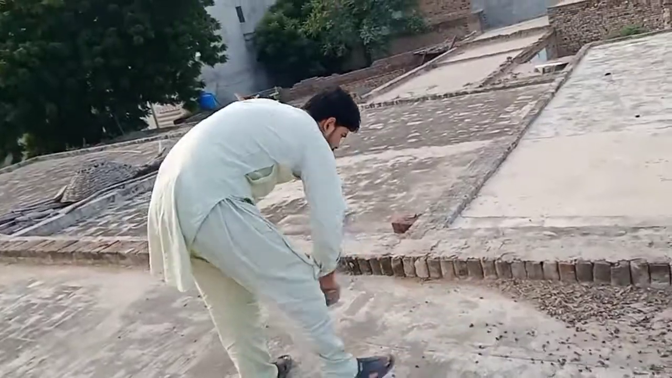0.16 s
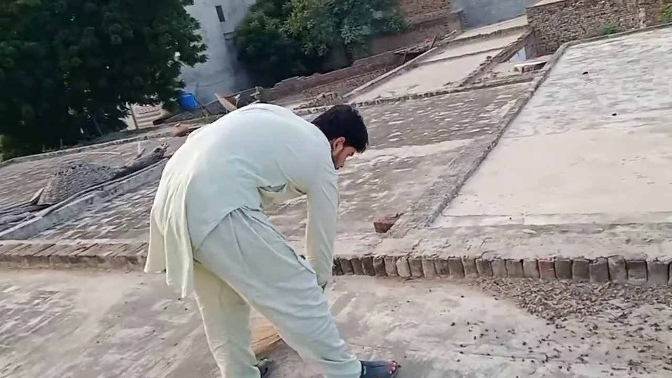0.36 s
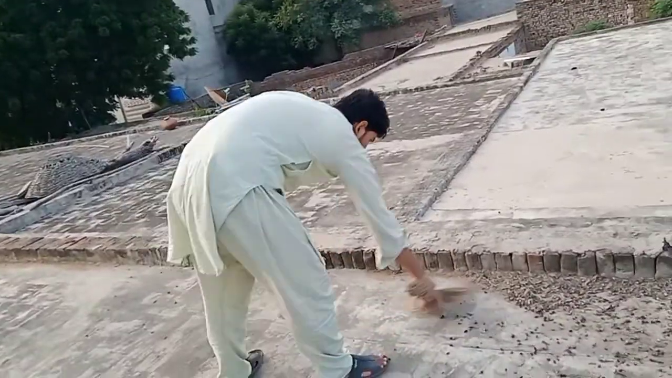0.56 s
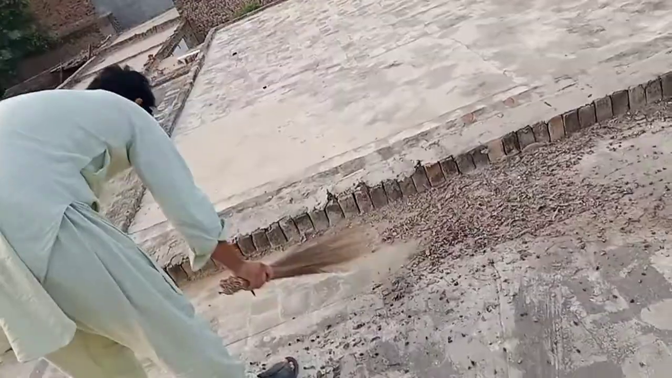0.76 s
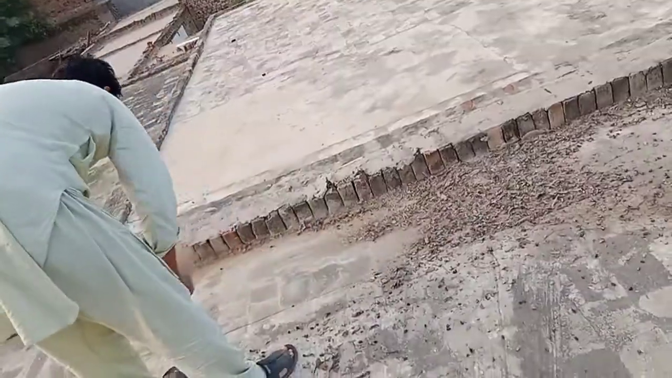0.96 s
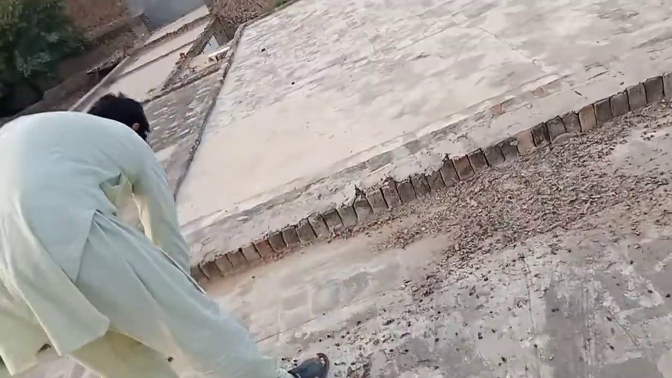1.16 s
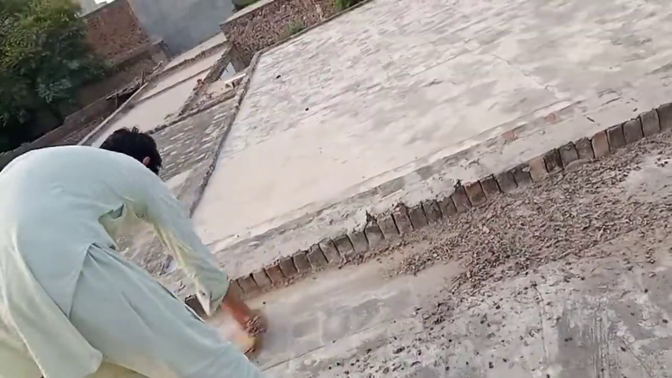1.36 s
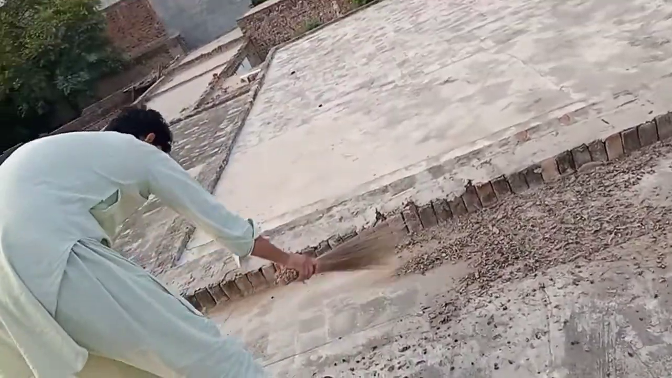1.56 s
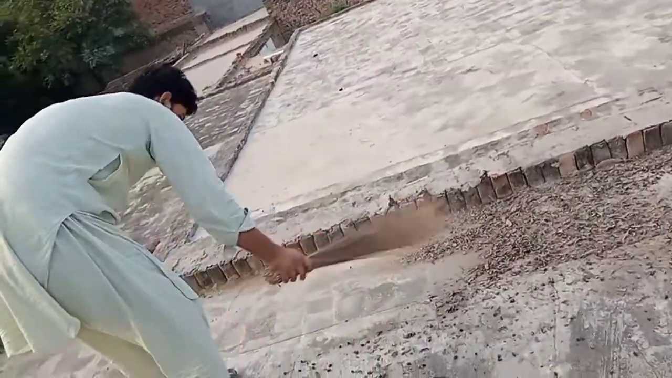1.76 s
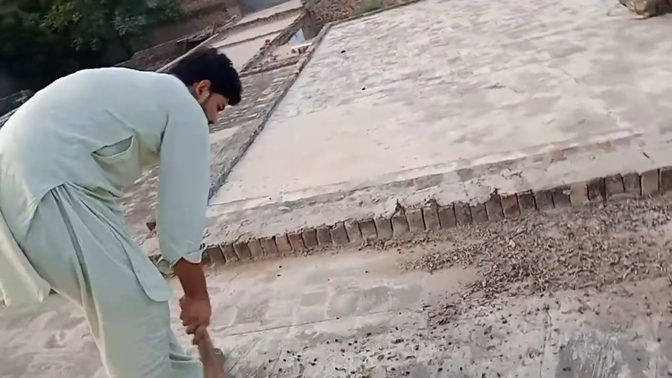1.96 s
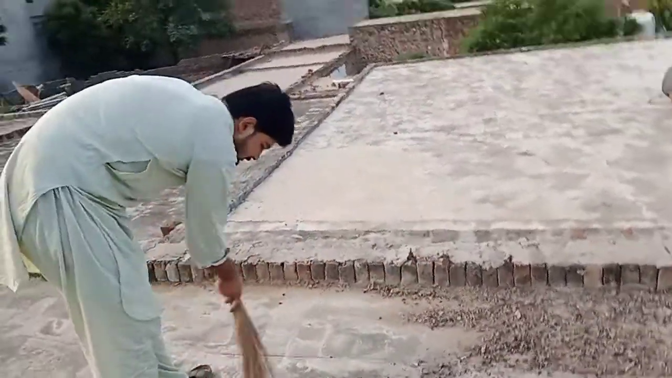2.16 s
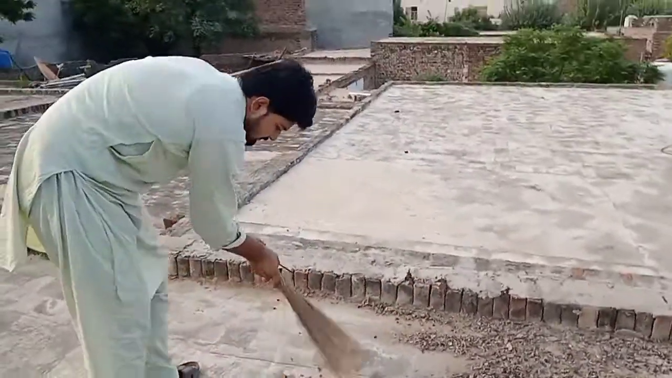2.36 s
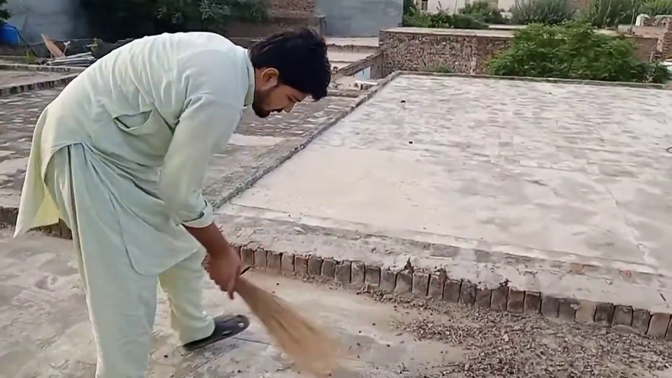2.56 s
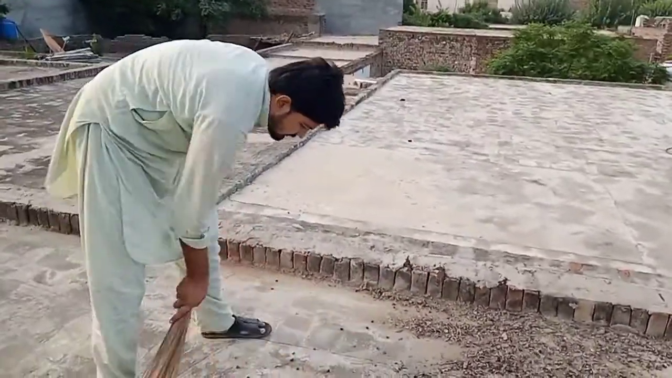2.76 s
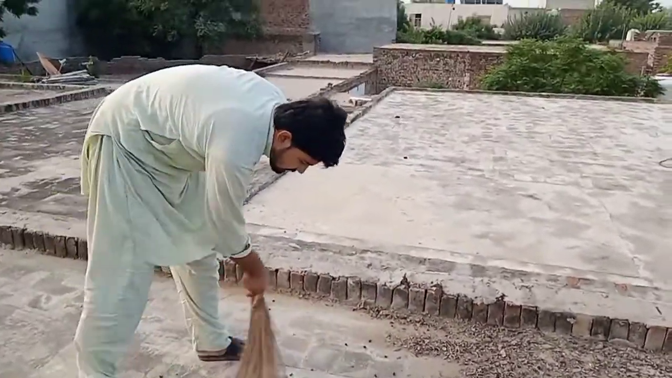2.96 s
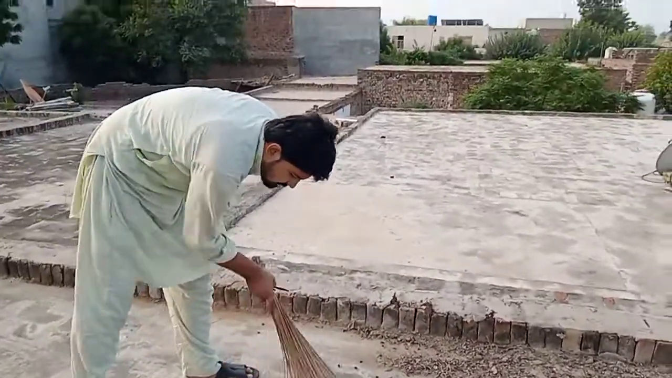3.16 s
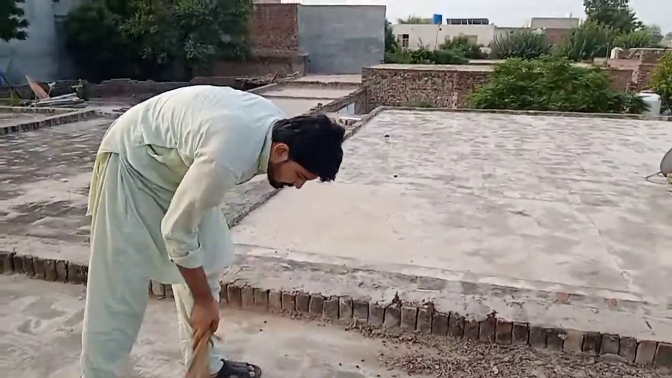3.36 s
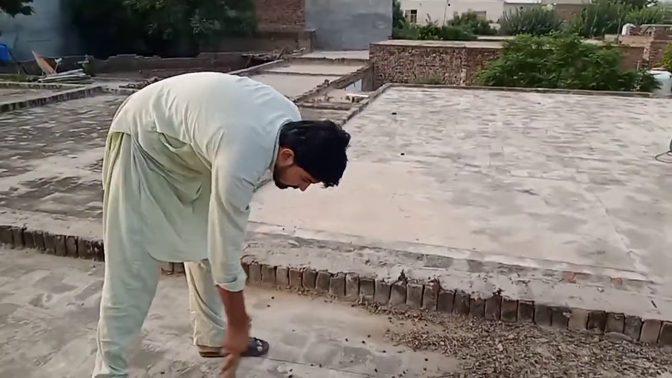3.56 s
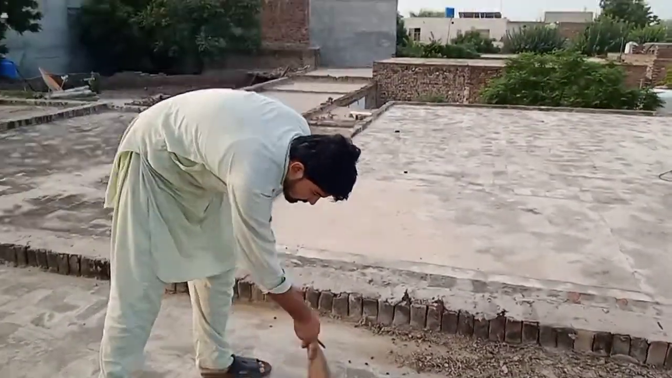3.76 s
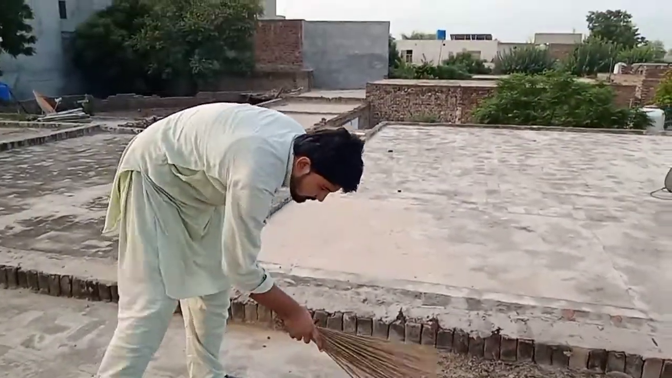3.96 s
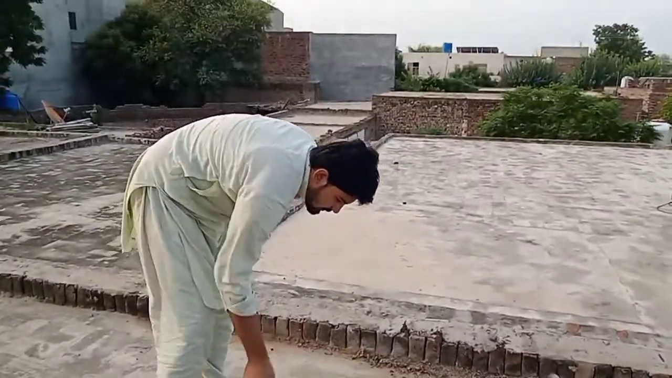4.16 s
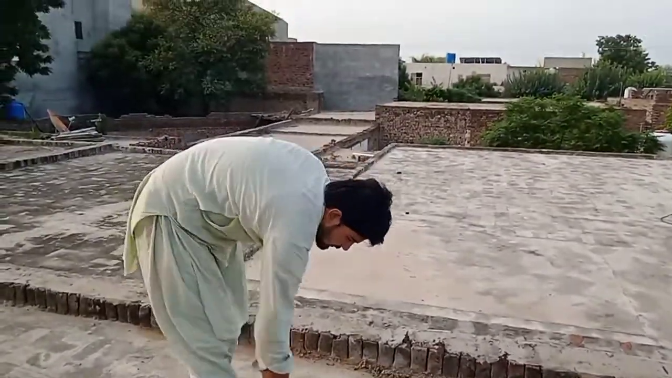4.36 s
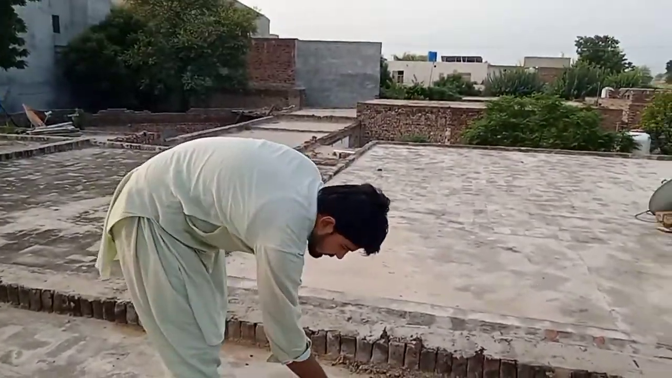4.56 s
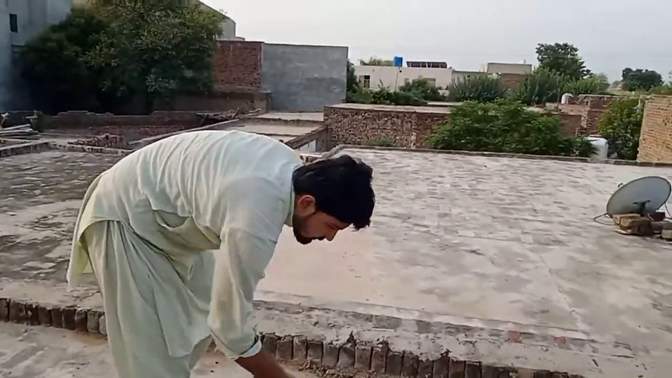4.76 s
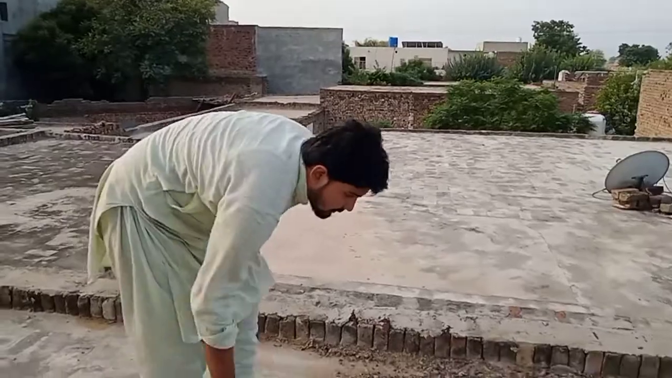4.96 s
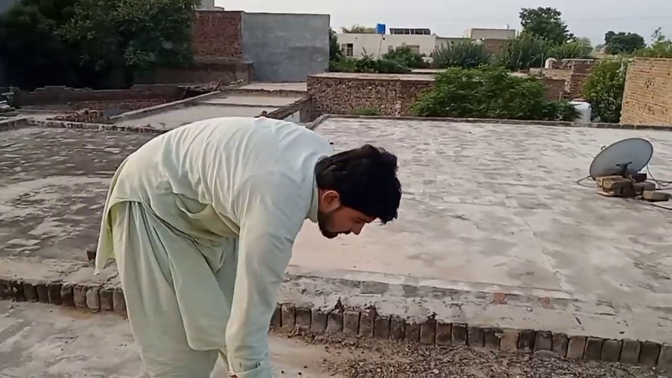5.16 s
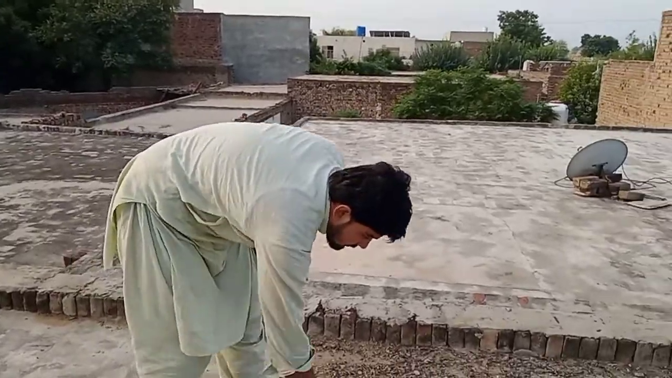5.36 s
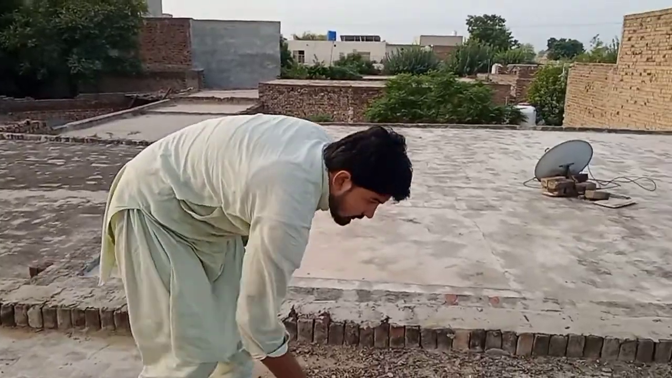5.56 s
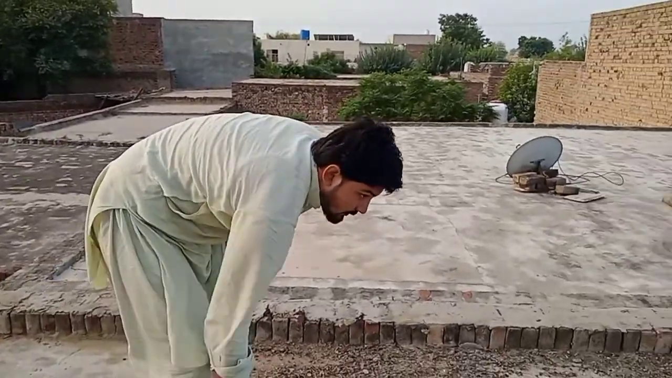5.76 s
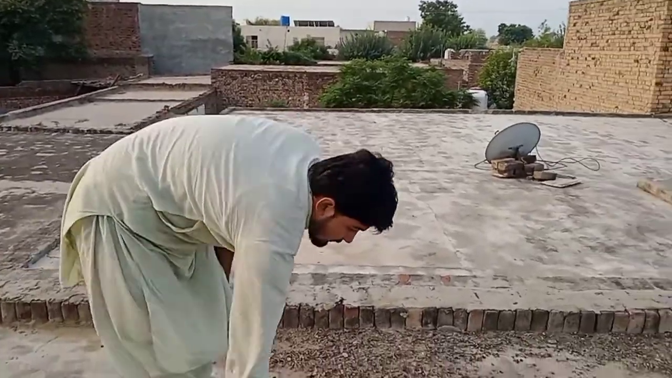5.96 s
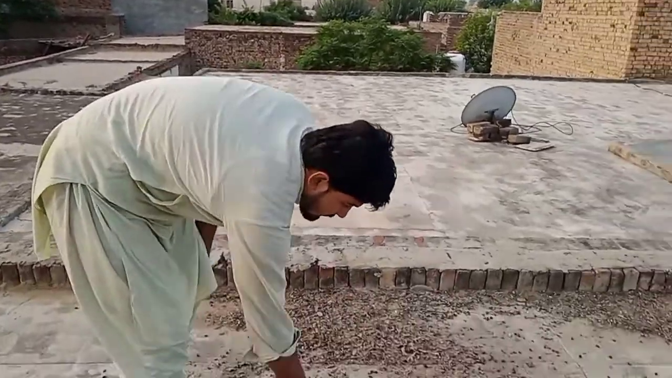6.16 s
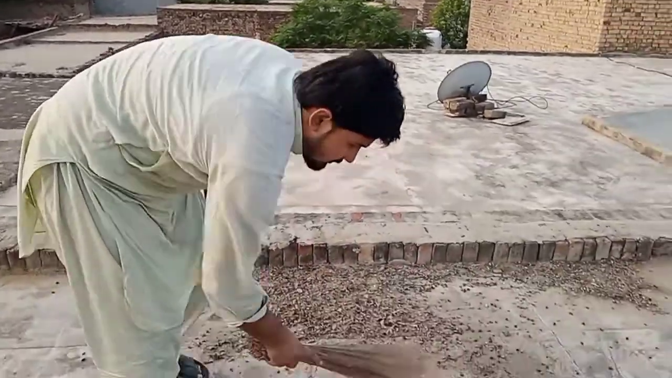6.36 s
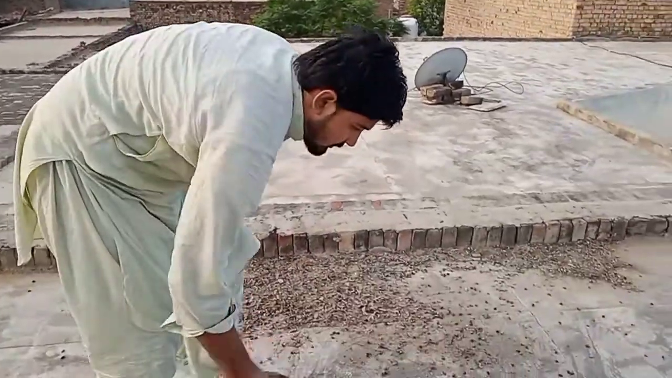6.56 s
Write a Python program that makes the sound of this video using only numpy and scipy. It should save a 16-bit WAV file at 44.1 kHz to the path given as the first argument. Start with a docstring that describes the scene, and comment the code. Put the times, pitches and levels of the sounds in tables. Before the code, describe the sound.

A short straw broom sweeps dust and grit across an open brick rooftop, close to the microphone. About nine dry, hissing strokes come at a steady pace, with stalks ticking and crumbs skittering between them. A little before halfway, three soft knocks and one sharp, loud click hit the microphone. A sandal scuffs lightly now and then, and small birds chirp faintly over the low hush of a distant town.

```python
"""A short straw broom swishes close by: nine strokes push dust and dry leaves over an open brick roof.
Stalk tips catch and slip and set the bundle ringing; loose grit ticks and a sandal scuffs.
Far off, small birds call over the hush of a town.
Partway through, three soft knocks and one sharp click land on the body of the mono microphone."""
import sys
import numpy as np
from scipy import signal
from scipy.fft import rfft, irfft, next_fast_len
from scipy.io import wavfile

SR = 44100
rng = np.random.default_rng(int(sys.argv[2]) if len(sys.argv) > 2 else 0)


def output_pcm(signal):
    """Save a mono or channel-first signal as 16-bit PCM at the path in sys.argv[1].

    Samples are clipped to [-1, 1] before scaling.
    """
    pcm = np.clip(np.atleast_2d(signal).T, -1, 1) * 32767
    wavfile.write(sys.argv[1], SR, np.round(pcm).astype(np.int16))


N = 295419
TIME = np.arange(N) / SR
PADDED = next_fast_len(N, True)
FREQS = np.maximum(np.fft.rfftfreq(PADDED, 1 / SR), 1)

# tone of the sweeping, including the microphone's resonant peaks: (frequency [Hz], relative level [dB])
SWEEP_COLOUR = [(1000, -35), (1270, -11), (1550, -16), (2200, -10.5), (2750, 1.5), (3700, -2.5),
                (5100, -3.5), (5750, 1), (6650, 0.5), (7200, 4.5), (8300, -8.5), (13700, -14.5), (14700, 1),
                (15400, 2)]
# pushes of the broom; a stroke is one or two, and some begin with a light touch:
# (touch [s], attack [s], hold [s], release [s], first swish [dB], last swish [dB],
#  rasp of bent stalks [dB re swish], scrape on brick [dB re swish], fine dust [dB re swish],
#  bundle ring [Hz], ring lift [dB])
BROOM_PUSHES = [ (0.62, 0.069, 0.13, 0.094, -37, -31.5, -8, -24, 3, 3800, 5),
                (1.102, 0.013, 0.073, 0.018, -39, -38.5, 2.5, -18, -15, 3420, 1.5),
                (1.263, 0.025, 0.17, 0.13, -39.5, -33, -5.5, -22, 0.5, 3970, 5),
                (1.457, 0.079, 0.1, 0.11, -39.5, -30.5, -8.5, -23.5, 5, 3900, 9),
                (2.071, 0.068, 0.098, 0.054, -34, -29, 2.5, -15, 0, 2920, -2),
                (2.222, 0.075, 0.24, 0.14, -31, -36.5, -8.5, -22, 1, 4040, 8),
                (2.826, 0.077, 0.082, 0.23, -34.5, -32, -7, -17, -0.5, 4520, 8.5),
                (2.999, 0.061, 0.1, 0.094, -31.5, -28, -16.5, -22, 0.5, 4730, 7),
                (3.547, 0.041, 0.033, 0.033, -47.5, -47, -21, -22, -3, 5400, 1),
                (3.619, 0.074, 0.24, 0.081, -28.5, -30, -16.5, -18.5, 1.5, 6300, 3),
                (4.287, 0.083, 0.047, 0.1, -37, -40, -28, -24.5, -3, 5130, 3.5),
                (4.455, 0.076, 0.24, 0.094, -28, -27, -21.5, -20, -2, 5120, 5.5),
                (5.191, .03, 0.033, .05, -47.5, -47.5, -25, -16, -0.5, 5670, 10.5),
                (5.253, 0.077, 0.19, 0.16, -30, -26.5, -17.5, -17.5, 1.5, 6060, 7.5),
                (5.579, 0.055, 0.043, 0.048, -28.5, -28.5, -21, -18.5, -1.5, 5900, 7),
                (6, 0.051, 0.049, 0.054, -39.5, -39, -22, -21, -0.5, 5900, 5.5),
                (6.105, 0.057, 0.18, 0.17, -29, -24, -20.5, -20, 0, 5940, 8), ]


def from_db(db):
    """Decibels to gain."""
    return 10 ** (np.asarray(db) / 20)


def unit_rms(x):
    """Scale to rms 1."""
    return x / np.sqrt(np.mean(x ** 2) + 1e-20)


def butter(x, order, hz, kind):
    """Butterworth filter."""
    return signal.sosfilt(signal.butter(order, hz, kind, fs=SR, output="sos"), x)


def colour(x, gain):
    """Filter by a gain per frequency; rms 1."""
    return unit_rms(irfft(rfft(x, PADDED) * gain, PADDED)[:N])


def spectrum(points):
    """Gain per frequency from (frequency [Hz], level [dB]) points."""
    hz, db = np.transpose(points)
    return from_db(np.interp(np.log(FREQS), np.log(hz), db))


def hump(hz, octaves):
    """A bell-shaped band on a log-frequency axis."""
    return np.exp(-.5 * (np.log2(FREQS / hz) / octaves) ** 2)


def drift(rate_hz):
    """Random wander, mostly slower than rate_hz; rms 1."""
    return colour(rng.standard_normal(N), 1 / (1 + (FREQS / rate_hz) ** 2))


def swell(start, length):
    """A rounded rise and fall."""
    return np.sqrt(np.abs(np.sin(np.pi * np.clip((TIME - start) / length, 0, 1))))


def bursts(source, rows):
    """Short swells of a noisy source, each in a band of its own."""
    return sum(from_db(db) * swell(start, length) * colour(source, hump(hz, octaves))
               for start, length, db, hz, octaves in rows)


def patchy(x, bands, depth_db, rate_hz, groups=9):
    """Narrow bands, dealt in turn into groups that swell and sink on their own; rms 1."""
    whole, group = rfft(x, PADDED), bands.astype(int) % groups
    parts = (irfft(whole * (group == k), PADDED)[:N] for k in range(groups))
    return unit_rms(sum(part * from_db(depth_db * drift(rate_hz)) for part in parts))


def ring(clicks, hz, t60):
    """A unit click sets a sine of height 1 ringing."""
    radius, angle = from_db(-60 / (t60 * SR)), 2 * np.pi * hz / SR
    poles = [1, -2 * radius * np.cos(angle), radius ** 2]
    return signal.lfilter([0, np.sin(angle)], poles, clicks + 1e-18)


def resonate(x, hz, width_hz, block=256):
    """A resonance whose centre moves, stepped block by block; gain 1 at its peak."""
    out, state = np.zeros(N), np.zeros(2)
    radius = np.exp(-np.pi * width_hz / SR)
    zeros = np.array([1, 0, -1]) * (1 - radius ** 2) / 2
    for i in range(0, N, block):
        poles = [1, -2 * radius * np.cos(2 * np.pi * hz[i] / SR), radius ** 2]
        out[i:i + block], state = signal.lfilter(zeros, poles, x[i:i + block], zi=state)
    return out


def slips(per_s, spread_db, crowding):
    """Tiny clicks of uneven size, per_s times crowding of them a second; rms 1."""
    sizes = from_db(spread_db * np.minimum(rng.exponential(1, N), 4))
    signs = rng.choice([-1, 1], N)
    slipping = rng.random(N) < per_s * crowding / SR
    return unit_rms(sizes * signs * slipping)


def town(bands_per_octave=8):
    """Far sounds of the town blur into a hush in which narrow bands come and go."""
    # colour of the hush: (frequency [Hz], relative level [dB])
    hush_colour = [(30, -35), (65, 3), (110, 2.5), (280, 0.5), (370, -3.5), (460, -2.5), (620, -6),
                   (1100, -3), (1260, 3), (1500, -1.5), (3200, -11), (7200, -13), (9500, -41),
                   (15000, -18.5)]
    # its level up on the roof: (time [s], level [dB])
    hush_level = [(.63, -72.5), (.9, -60.5), (2.0, -59), (2.7, -58.5), (4.2, -62), (5.0, -63), (5.9, -58.5),
                  (6.3, -66), (6.65, -59.5)]
    hush = colour(rng.standard_normal(N), spectrum(hush_colour))
    level = from_db(np.interp(TIME, *np.transpose(hush_level)))
    return level * patchy(hush, np.log2(FREQS) * bands_per_octave, depth_db=4.5, rate_hz=5)


def birds(waver=0.0034, chirp_s=0.07, rasp_db=1.5, waver_hz=130):
    """Distant thin whistles, rougher the shorter they are, with hoarse chucks and a blur of chatter."""
    # whistles: (time [s], length [s], start [Hz], middle [Hz], end [Hz], level before rasp [dB])
    calls = [(0.796, 0.057, 3330, 3590, 3900, -46), (0.861, 0.021, 3775, 3590, 3400, -37),
             (1.224, 0.013, 2580, 2800, 3400, -47), (1.245, .035, 3590, 3750, 3620, -49),
             (1.704, 0.061, 3300, 3640, 3950, -44), (2.017, 0.033, 3400, 3240, 3270, -51),
             (2.673, 0.044, 4250, 3850, 3400, -44), (4.795, 0.29, 3540, 3490, 3524, -59.5),
             (5.128, 0.093, 3410, 3430, 3430, -55.5), (5.13, 0.088, 1715, 1700, 1690, -56.5),
             (5.746, 0.098, 3180, 3384, 3390, -53), (5.96, 0.072, 3280, 3395, 3400, -52)]
    # blurred far chatter: (time [s], length [s], level [dB], centre [Hz], width [octaves])
    chatter = [(0.895, 0.14, -57, 3800, 0.042), (1.056, 0.14, -62.5, 873, 0.019),
               (1.75, 0.25, -61, 3970, 0.062), (1.828, 0.068, -56, 3170, 0.055),
               (3.188, 0.51, -56, 4340, 0.19), (3.984, 0.3, -63, 1890, 0.16),
               (4.788, 0.69, -69, 810, 0.069), (6.12, 1, -57.5, 1980, 0.24)]
    # one bird repeats a hoarse chuck: (time [s], level [dB])
    chucks = [(5.033, -48), (5.246, -47.5), (5.874, -50), (6.091, -46.5), (6.526, -54)]
    chuck_s, chuck_hz, chuck_octaves = 0.023, 2465, 0.14
    whistles, wobble, tremor = np.zeros(N), drift(waver_hz), drift(waver_hz)
    for start, length, first, middle, last, db in calls:
        on = (TIME > start) & (TIME < start + length)
        rough = min(chirp_s / length, 2)
        glide = np.polyfit([0, .5, 1], [first, middle, last], 2)
        hz = np.polyval(glide, (TIME[on] - start) / length) * (1 + waver * rough * wobble[on])
        level = from_db(db + rasp_db * rough * (tremor[on] - 1)) * swell(start, length)[on]
        whistles[on] += level * np.sqrt(2) * np.sin(2 * np.pi * np.cumsum(hz) / SR)
    chuck_rows = [(start, chuck_s, db, chuck_hz, chuck_octaves) for start, db in chucks]
    return whistles + bursts(rng.standard_normal(N), chatter + chuck_rows)


def rooftops(x, wet_db, t60):
    """The direct sound, then faint scatter from parapets and neighbouring walls."""
    age = TIME[:SR // 2]
    tail = rng.standard_normal(len(age)) * from_db(-60 * age / t60) * (age > .008)
    return x + from_db(wet_db) * signal.fftconvolve(x, tail / np.linalg.norm(tail))[:N]


def microphone_knocks(low_hz=600, high_hz=6200):
    """Each knock on the microphone is a hard crack, a short ring of its port and a dull body thump."""
    # strength of the knocks: (time [s], crack [dB], port ring [dB], thump [dB])
    hits = [(2.659, -37, -33.5, -59.5), (2.703, -42, -43.5, -32.5), (2.728, -36, -47, -57),
            (2.7836, -6.5, -21.5, -26.5)]
    # low modes of the microphone body: (frequency [Hz], gain [dB], t60 [s])
    body_modes = [(85, -29, 0.12), (175, -10, 0.028), (320, 3.5, 0.0088)]
    # mode of its port: (frequency [Hz], t60 [s])
    port_mode = (1290, 0.019)
    times, *levels = np.transpose(hits)
    pulses = np.zeros((3, N))
    pulses[:, np.round(times * SR).astype(int)] = from_db(levels)
    crack, port, thump = pulses
    crack = butter(crack + 1e-18, 4, high_hz, "low") * SR / (2 * high_hz)
    body = sum(from_db(db) * ring(thump, hz, t60) for hz, db, t60 in body_modes)
    return butter(crack, 1, low_hz, "high") + ring(port, *port_mode) + body


def sandal_scuffs(lurch_db=3.5, lurch_hz=25):
    """Near the microphone a rubber sole grinds unevenly on dusty brick."""
    # scuffs and shifts of weight: (time [s], length [s], level [dB], centre [Hz], width [octaves])
    scuffs = [(2.082, 0.23, -57, 330, 1.4), (2.114, 0.15, -44.5, 1670, 0.11),
              (3.38, 0.1, -55.5, 1126, 0.082), (3.415, 0.085, -53.5, 218, 2.04),
              (3.484, 0.14, -56, 560, 1.1), (3.537, 0.2, -58.5, 1174, 0.035),
              (4.474, 0.019, -33.5, 1250, 0.26), (6.57, 0.17, -66, 700, 0.14)]
    grinding = slips(per_s=2200, spread_db=3.5, crowding=0.76)
    return bursts(grinding * from_db(lurch_db * drift(lurch_hz)), scuffs)


def ticks(t60=0.015, band_ratio=1.15, gain_db=-6, edge_db=-15, size=2048):
    """A stalk or a grain lets go: a few milliseconds around its own pitch, with a crisp edge."""
    # stalks snapping and grit ticking: (time [s], level before gain_db [dB], pitch [Hz])
    snaps = [(1.083, -39, 2400), (1.111, -19.5, 3240), (1.1125, -25, 6500), (1.127, -17, 3400),
             (1.1409, -25, 3200), (2.028, -39, 3250), (2.098, -25.5, 3100), (2.207, -15, 2980),
             (2.249, -14, 6640), (2.683, -35.5, 6340), (4.145, -26, 6160), (4.162, -29, 6500),
             (4.171, -30, 6160), (4.288, -37, 6100), (4.959, -31.5, 6400), (4.995, -29.5, 5530),
             (5.038, -33.5, 5770), (5.1, -31.5, 6200), (5.119, -35, 6000), (5.215, -34, 6260),
             (5.790, -27.5, 5800), (5.856, -31.5, 5570), (5.879, -37, 3940), (6.565, -23, 6100),
             (6.586, -23.5, 6260), (6.667, -16.5, 5910)]
    out = np.zeros(N)
    fade = from_db(-60 * TIME[:size] / t60)
    for start, db, hz in snaps:
        snap = fade * rng.choice([-1, 1], size)
        body = butter(snap, 2, [hz / band_ratio, hz * band_ratio], "band")
        edge = butter(snap * fade, 2, hz, "high")
        tick = body * np.linalg.norm(fade) / np.linalg.norm(body) + from_db(edge_db) * edge
        at = round(start * SR)
        out[at:at + size] += (from_db(db + gain_db) * tick)[:N - at]
    return out


def debris(level_db=-64, bunch_db=3, bunch_hz=7.8, low_hz=3800, high_hz=8000, pitches=16):
    """Swept crumbs and leaves go on rolling between the strokes, each with a faint pitch."""
    crumbs = slips(per_s=800, spread_db=2.5, crowding=from_db(bunch_db * drift(bunch_hz)))
    pitch_index = rng.integers(0, pitches, N)
    rings = sum(ring(crumbs * (pitch_index == k), hz, t60=0.016)
                for k, hz in enumerate(np.geomspace(low_hz, high_hz, pitches)))
    return from_db(level_db) * colour(rings, spectrum(SWEEP_COLOUR))


def flung_grit(gain_db=-21, settle_db_per_s=58, edge_db=-16):
    """Each push flings grains that skip over the brick and settle; harder pushes fling them harder."""
    strength = np.zeros(N)
    for touch, attack, hold, _, _, last_db, *_ in BROOM_PUSHES:
        age = TIME - (touch + attack + hold)
        settling = (age > 0) * from_db(last_db - settle_db_per_s * np.abs(age))
        strength = np.maximum(strength, settling)
    grains = slips(per_s=170, spread_db=4, crowding=0.81) * strength
    tone = spectrum(SWEEP_COLOUR) * (hump(5070, 0.24) + from_db(edge_db) * hump(9400, 0.69))
    return from_db(gain_db) * np.std(grains) * colour(grains, tone)


def register_gains(attack_power=1.42, release_db=17, trail_db_per_s=83):
    """Gains of scrape, rasp, swish and dust: each push bears down, holds, lifts off and trails away."""
    # shift as the bent stalks straighten: (scrape [dB/s], rasp [dB/s], swish [dB/s], dust [dB/s])
    straightening = (-1, -7.5, -2.5, -12)
    # share of the fall as the broom lifts: (scrape [dB/dB], rasp [dB/dB], swish [dB/dB], dust [dB/dB])
    fall_share = (1.1, 0.98, 1.098, 1.284)
    shift, share = np.array(straightening)[:, None], np.array(fall_share)[:, None]
    power = np.zeros((4, N))
    for touch, attack, hold, release, first_db, last_db, rasp, scrape, dust, _, _ in BROOM_PUSHES:
        on = (TIME > touch) & (TIME < touch + 1)
        age = TIME[on] - touch
        pressed = np.minimum(age / attack, 1) ** attack_power
        held, lifted = np.clip(age - attack, 0, hold), np.maximum(age - attack - hold, 0)
        force_db = first_db + (last_db - first_db) * held / hold
        fall_db = release_db * np.minimum(lifted / release, 1)
        fall_db += trail_db_per_s * np.maximum(lifted - release, 0)  # the last tips trail off
        balance_db = np.array([[scrape], [rasp], [0], [dust]]) + shift * (held - hold / 2)
        power[:, on] += (pressed * from_db(force_db + balance_db - share * fall_db)) ** 2
    return np.sqrt(power)


def friction(swish, tuft_db=0.5, tuft_hz=160, rub_share=0.79, full_contact_db=-39):
    """Tips catch and slip over the smooth rub of dust; at a light touch few drag, and they crackle."""
    contact = np.clip(swish / from_db(full_contact_db), .12, 1)
    tufts = from_db(tuft_db * drift(tuft_hz))  # slips crowd where a tuft lets go
    tips = unit_rms(slips(per_s=7000, spread_db=3.5, crowding=tufts * contact) / np.sqrt(contact))
    rub = rng.standard_normal(N)
    return tufts * (np.sqrt(1 - rub_share) * tips + np.sqrt(rub_share) * rub)


def brick_bounce(x, lag_s=0.0008835, travel=0.12, travel_hz=2.64):
    """The brick returns a weak copy whose lag wanders with the broom: ripples slide through the hiss."""
    lag = lag_s * np.exp(travel * drift(travel_hz))
    return x + .3 * np.interp(TIME - lag, TIME, x)


def bundle_bend(rise_octaves_per_s=0.1):
    """Pitch [Hz] and lift [dB] of the bent bundle's resonance; the pitch climbs through each hold."""
    points = [(touch + attack + hold / 2 + offset, hz * 2 ** (rise_octaves_per_s * offset), lift_db)
              for touch, attack, hold, *_, hz, lift_db in BROOM_PUSHES
              for offset in (-hold / 2, hold / 2)]
    times, hz, lift_db = np.transpose(points)
    return np.interp(TIME, times, hz), np.interp(TIME, times, lift_db)


def stalks(rubbing, spacing_hz=190):
    """Single stalks ring briefly as they touch down; the bundle's broad resonance follows its bend."""
    ring_hz, lift_db = bundle_bend()
    ringing = patchy(rubbing, FREQS / spacing_hz, depth_db=1.81, rate_hz=12)
    return ringing + (from_db(lift_db) - 1) * resonate(ringing, ring_hz, width_hz=600)


def broom(flutter_db=0.28, flutter_hz=25, trims_db=(-1, -1, -1, 0)):
    """Close up, friction rings the stalks; angle and pressure shift the weight among four registers."""
    edges_hz = [300, 2300, 4200, 8500, 20000]  # scrape, rasp, swish and dust lie between these
    gains = register_gains()
    hiss = stalks(brick_bounce(friction(swish=gains[2])))
    tone, out = spectrum(SWEEP_COLOUR), np.zeros(N)
    for low, high, gain, trim_db in zip(edges_hz, edges_hz[1:], gains, trims_db):
        register = 1 / (1 + (low / FREQS) ** 16) / (1 + (FREQS / high) ** 16)
        out += gain * colour(hiss, tone * register) * from_db(trim_db + flutter_db * drift(flutter_hz))
    return out


def scene():
    """Broom and feet near the microphone, birds and town far off; the same in both channels."""
    sweeping = broom() + debris() + flung_grit()
    near = sweeping + rooftops(ticks() + sandal_scuffs(), wet_db=-13.5, t60=0.09)
    far = rooftops(birds(), wet_db=-9, t60=0.62) + town()
    return np.tile(near + far + microphone_knocks(), (2, 1))


def record(dry):
    """Silence until the microphone opens; the deep bass is thinned and the top is cut steeply."""
    open_s, fade_s = 0.63, 0.0048
    low_cut_hz, high_cut_hz = 50, 15620
    opened = np.clip((TIME - open_s) / fade_s, 0, 1)
    thinned = butter(dry * opened, 3, low_cut_hz, "high")
    top_cut = 1 / (1 + (FREQS / high_cut_hz) ** 300)
    return irfft(rfft(thinned, PADDED) * top_cut, PADDED)[:, :N]


dry = scene()
out = record(dry)
output_pcm(out)
```